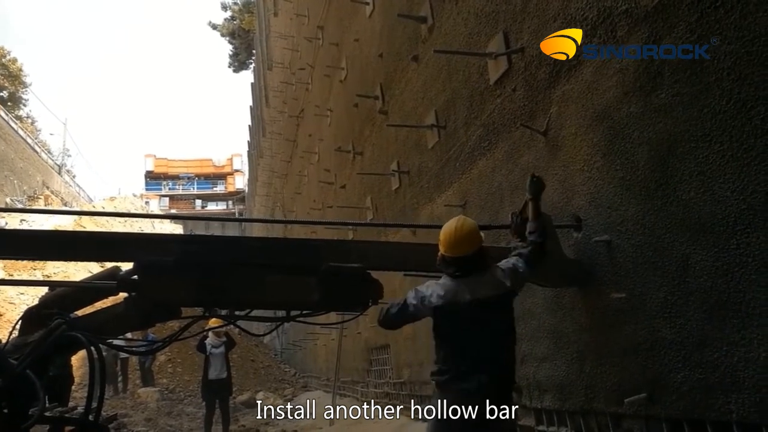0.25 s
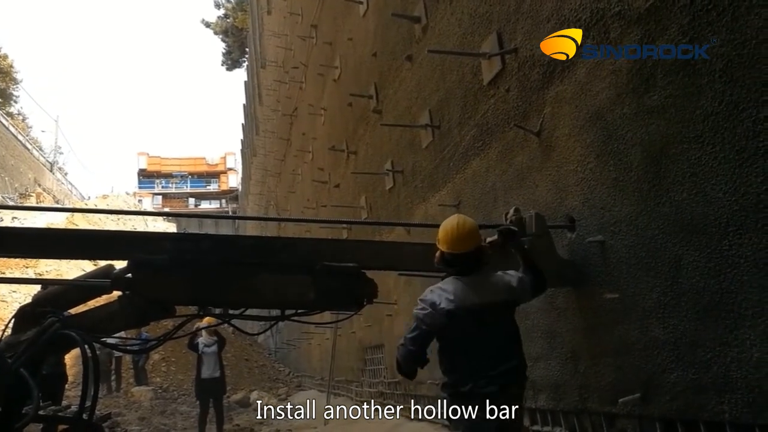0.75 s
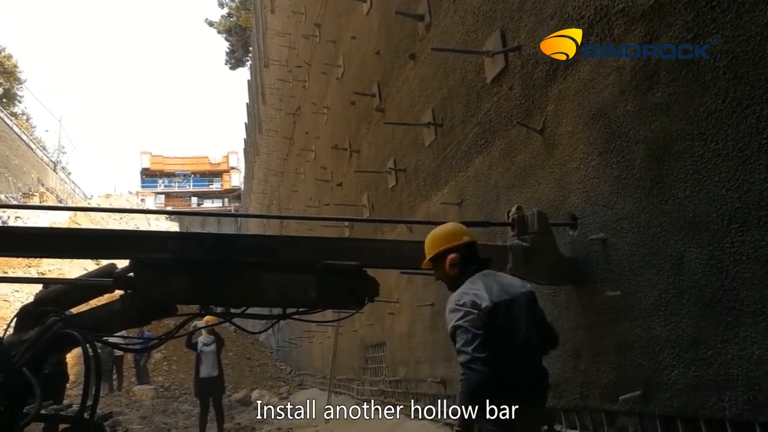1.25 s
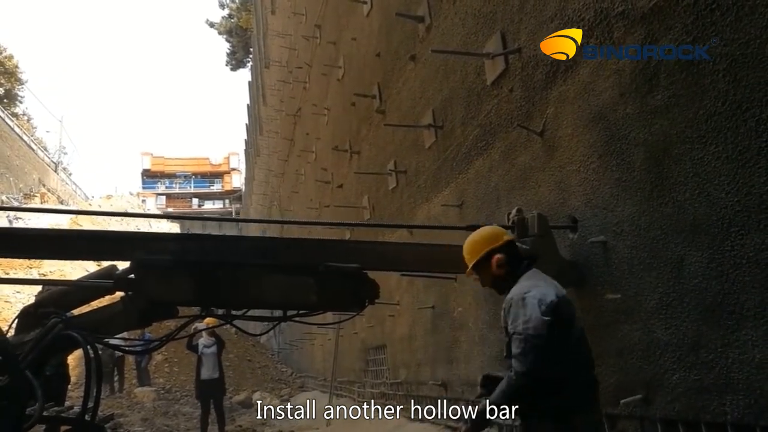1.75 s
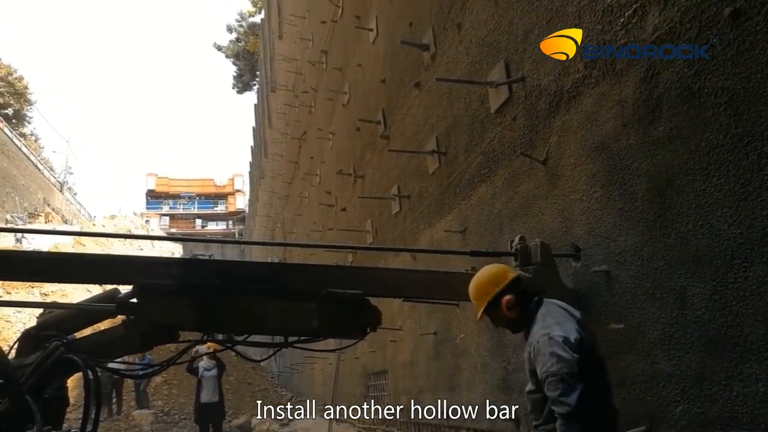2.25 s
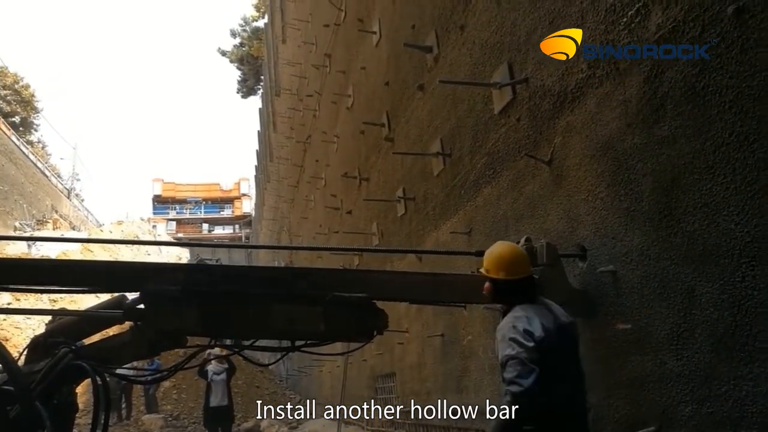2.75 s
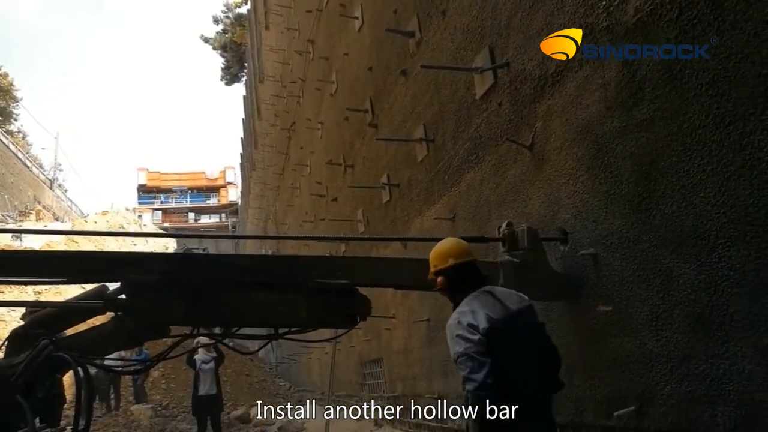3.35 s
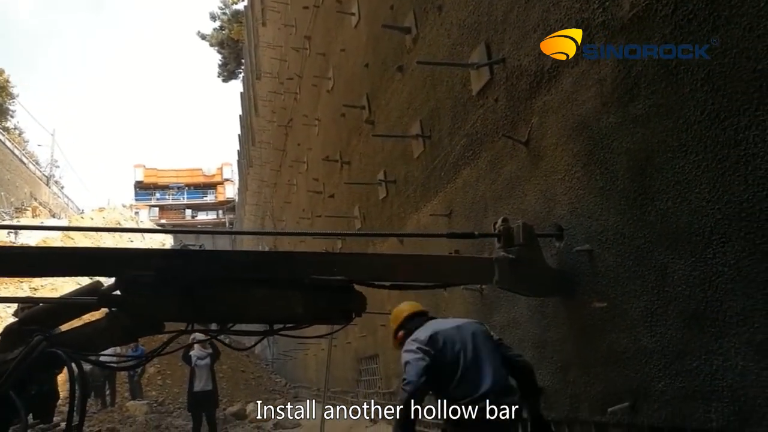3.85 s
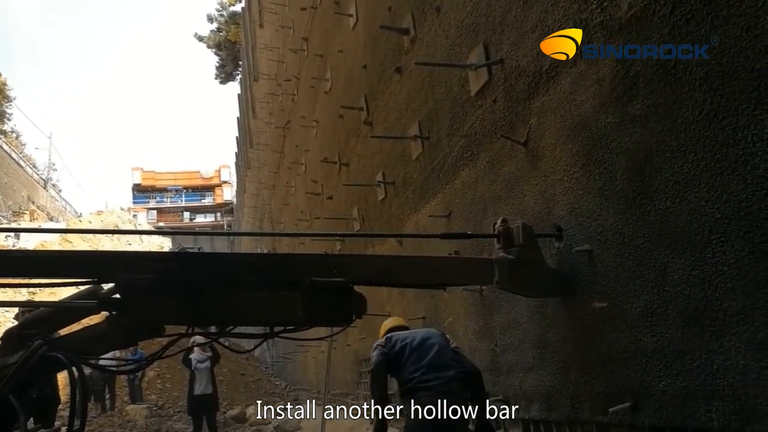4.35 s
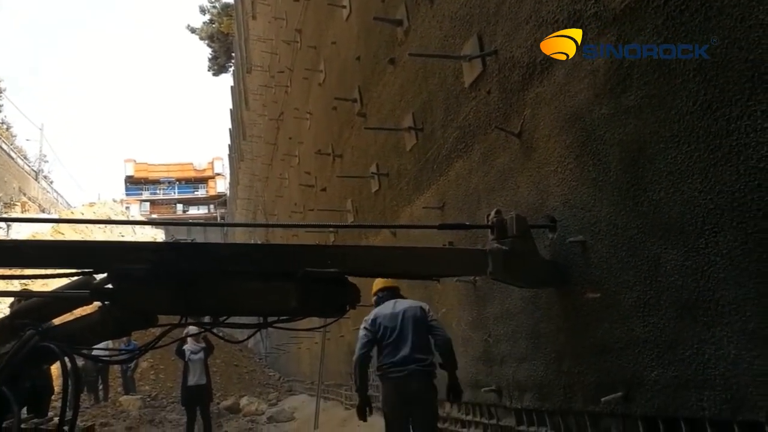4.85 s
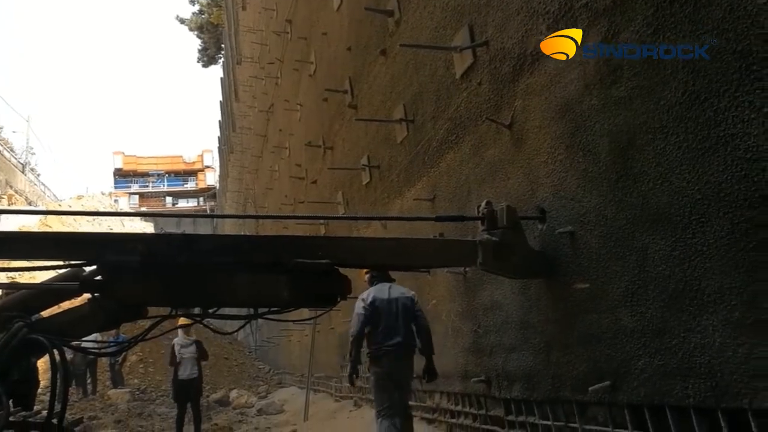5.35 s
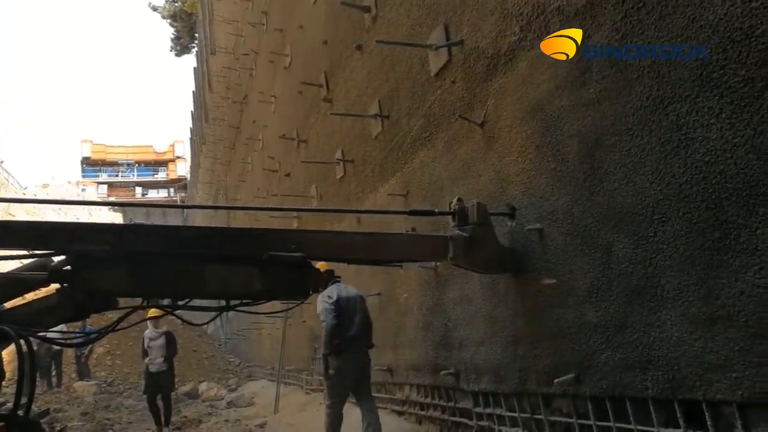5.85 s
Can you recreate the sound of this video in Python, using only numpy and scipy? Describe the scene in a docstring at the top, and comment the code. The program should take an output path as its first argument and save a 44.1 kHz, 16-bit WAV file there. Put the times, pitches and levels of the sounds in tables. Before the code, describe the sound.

Outdoors beside a shotcreted slope, a drill rig throbs quietly and low. Air seeps from a hollow steel bar, hissing faintly with a high flickering whistle. Two bright steel clinks come close together, the flow choking between them and then blowing free in a hiss that dies away. Wet spurts and raspy squeals follow, until a loud rush of air and water bursts out, buffeting the close microphone, spattering and knocking with mud.

```python
"""A drill rig throbs and rumbles while air and water begin to seep from a hollow steel bar: filtered noise and drops.
The seeping air soon whistles and squeals as gliding tones; then the steel clinks twice as a set of decaying partials.
Between the clinks the flow chokes, then it blows free; later come wet spurts, bursting slugs and rougher squeals.
At last the full rush breaks out with a blast of air, buffeting the microphone with deep noise,
spattering in random bursts and knocking as lumps of mud slap and thud."""
import sys
import numpy as np
from scipy import signal
from scipy.fft import rfft, irfft
from scipy.io import wavfile
from scipy.ndimage import uniform_filter1d, map_coordinates

SR = 44100
rng = np.random.default_rng(int(sys.argv[2]) if len(sys.argv) > 2 else 0)


def wrap_up_sound(samples):
    """Save the sound to the file named by the first command line argument, as 16-bit audio."""
    columns = np.atleast_2d(samples).T
    # keep every value between -1 and 1, then stretch to whole-number steps
    tamed = np.clip(columns, -1, 1)
    steps = np.round(tamed * 32767).astype(np.int16)
    wavfile.write(sys.argv[1], SR, steps)


N = 269892
T = np.arange(N) / SR
HZ = np.maximum(np.arange(N // 2 + 1) * SR / N, 1)


def undb(db):
    """Decibels to gain."""
    return 10 ** (np.asarray(db) / 20)


def unit(x):
    """Scale so that the mean of the channels has rms 1."""
    return x / np.std(np.atleast_2d(x).mean(axis=0))


def noise(channels=2):
    """White noise: independent channels of turbulence."""
    return rng.standard_normal((channels, N) if channels > 1 else N)


def curves(table):
    """The columns of a table, after its times, at every sample."""
    s, *columns = np.transpose(table)
    return [np.interp(T, s, c) for c in columns]


def window(start, end, fade):
    """Open between two times, with short power-keeping fades."""
    opening = np.clip((T - start) / fade + .5, 0, 1)
    closing = np.clip((end - T) / fade + .5, 0, 1)
    return np.sqrt(opening * closing)


def strike(start, t60, rise):
    """Envelope of a blow: a quick rise and an exponential fall."""
    age = np.maximum(T - start, 0)
    return np.minimum(age / rise, 1) * np.exp(-np.minimum(np.log(1000) * age / t60, 20))


def surge(start, rise, hold, fall):
    """Envelope of a push of air: it builds, holds and runs out."""
    spent = np.maximum(T - start - rise - hold, 0) / fall
    return np.clip((T - start) / rise, 0, 1) * np.exp(-np.minimum(spent ** 2, 20))


def shape(x, gain):
    """Filter by a gain at every frequency."""
    return irfft(rfft(x) * gain, N)


def lowpass(hz, order=4):
    """Gain of a smooth low-pass."""
    return 1 / np.sqrt(1 + (HZ / hz) ** (2 * order))


def highpass(hz, order=4):
    """Gain of a smooth high-pass."""
    return 1 / np.sqrt(1 + (hz / HZ) ** (2 * order))


def colour(points, resonances=()):
    """Gain of a broad spectrum with resonances on top."""
    hz, db = np.transpose(points)
    lifts = sum(lift / (1 + (2 * (HZ - f) / width) ** 2) for f, width, lift in resonances)
    return undb(np.interp(np.log(HZ), np.log(hz), db) + lifts)


def walk(rate):
    """Smooth chance with spread 1, moving up to about rate times a second."""
    return unit(shape(noise(1), lowpass(rate, order=2)))


def drops(rate, spread_db):
    """Droplet impacts in two channels: many small, a few large."""
    hit = rng.random((2, N)) < rate / SR
    size = undb(spread_db * np.minimum(rng.exponential(size=(2, N)), 4))
    return unit(hit * rng.choice([-1, 1], (2, N)) * size)


def spread(x, width, pan):
    """Stereo image: set the side level and the left-right balance at every frequency."""
    mid = (x[0] + x[1]) / 2
    side = shape((x[0] - x[1]) / 2, colour(width))
    balance = colour(pan) ** np.array([[.5], [-.5]])
    return shape(np.array([mid + side, mid - side]), balance)


def pit(x, t60, wet_db):
    """Direct sound in the centre; dense reflections from the walls of the cut widen it."""
    t = T[:SR // 2]
    tail = rng.standard_normal(len(t)) * undb(-60 * t / t60)
    echo = signal.fftconvolve(x, tail / np.sqrt(np.sum(tail ** 2)))[:N]
    return x + undb(wet_db) * echo * np.array([[1], [-1]])


def nearby(x, echo_db, reach_s, count=14):
    """Early echoes off the boom and the wall comb the treble and make it hollow."""
    echoes = np.zeros((2, N))
    for ear in echoes:
        at = (SR * reach_s * rng.uniform(.05, 1, count)).astype(int)
        ear[at] = rng.choice([-1, 1], count) / np.sqrt(count)
    share = undb(echo_db) * highpass(520, order=2)
    return shape(x, (1 + share * rfft(echoes)) / np.hypot(1, share))


def wander(x, depth_s, rate):
    """The air paths keep changing with the water in them, so their resonances drift in pitch."""
    at = (T + depth_s * walk(rate)) * SR
    return np.array([map_coordinates(ear, [at], order=5, mode="mirror") for ear in x])


def churn(x, patchy_db, low_db, span_s, bands_per_octave):
    """Water keeps reshaping the opening, so narrow bands swell and fade independently, the low ones most."""
    hz, s, z = signal.stft(x, SR, nperseg=1024, noverlap=768)
    octaves = np.log2(1 + hz / 600)
    chance = rng.standard_normal((128, 512))
    grid = np.meshgrid(octaves * bands_per_octave, s / span_s, indexing="ij")
    field = map_coordinates(chance, grid, mode="mirror")
    gain = undb((patchy_db + low_db * np.exp(-octaves ** 2))[:, None] * field)
    gain = gain / np.sqrt(np.mean(gain ** 2, axis=1, keepdims=True))
    return signal.istft(z * gain, SR, nperseg=1024, noverlap=768)[1][:, :N]


def follow(control_db, law):
    """Levels of air, spray and water that follow one control."""
    return np.array([db + slope * control_db for db, slope in law])


def flow(levels, gain, drop_rate, drop_db, flutter_db, gurgle_db):
    """Air hisses, spray crackles and water gurgles in one opening; passing water makes them flutter together."""
    air_db, spray_db, water_db = levels
    flutter = walk(18.0)
    gurgle = (flutter + walk(21)) / 2
    # level/dB, band gain, lower and upper f/Hz between which that level holds
    layers = [(air_db + .5 * flutter_db * flutter, highpass(3230), 4200, 15000),
              (spray_db + flutter_db * flutter, highpass(880) * lowpass(3900), 900, 3000),
              (water_db + gurgle_db * gurgle, highpass(168) * lowpass(845), 200, 800)]
    out = 0
    for db, band, lo, hi in layers:
        jet = unit(unit(noise()) + undb(drop_db) * drops(drop_rate, 3.44))
        strength = np.sqrt(np.mean((gain * band) ** 2 * (HZ > lo) * (HZ < hi)))
        out = out + shape(jet, gain * band) / strength * undb(db)
    return out


# seepage before the flow blows free, a control: t/s, level/dB
SEEP = [(0.0, -87), (0.21, -56), (0.27, -49), (0.42, -41), (0.6, -46), (0.72, -39), (0.79, -44),
        (0.92, -38.5), (1.24, -42), (1.34, -37), (1.43, -39.5), (1.52, -35.5), (2.0, -42.5), (2.06, -49),
        (2.14, -42.5), (2.47, -39.5), (2.48, -39.5)]
# how air, spray and water follow it: level/dB at the usual seepage, slope/dB per dB
SEEP_LAW = [(-37, 0.7), (-40, 1.0), (-44.5, 0.97)]
# the constant leak, before its build-up: air hiss level/dB, spray level/dB, water gurgle level/dB
LEAK_DB = (-43, -56, -55.5)
# build-up of the leak with the pressure: t/s, gain level/dB
LEAK_BUILD = [(0.15, -2.5), (0.35, 0.5)]
# spurts: t/s, rise/s, hold/s, air fall/s, air hiss level/dB, spray level/dB, water gurgle level/dB
SPURTS = [(2.722, 0.042, 0.23, 0.28, -22.5, -32, -42.5), (3.846, .01, 0.029, 0.13, -37.5, -40, -40),
          (3.864, 0.028, 0.017, 0.26, -34, -41, -58), (4.046, 0.01, 0.023, 0.12, -38.5, -49, -41),
          (4.187, 0.024, .02, 0.027, -44, -48.5, -67), (4.477, 0.0064, 0.038, 0.2, -38, -43, -52),
          (4.575, 0.057, .01, 0.036, -31.5, -35.5, -49.5), (4.672, 0.011, 0.035, 0.058, -43, -40.5, -37)]
SEEP_USUAL_DB, SEEP_END_S = -40, 2.76
AIR_SLOW_S = 0.19  # the air follows the seepage averaged over this time
WET_LINGER = 1.27  # spray and water fall this much longer than the air of a spurt
DRIP_DB, DRIP_FALLS = -8.5, 2.5  # drip after a spurt: level relative to it, decay in fall times


def coupling_levels():
    """Air, spray and water at the coupling: a constant leak, the early seepage, then spurts that drip away."""
    seep_db = follow(curves(SEEP)[0] - SEEP_USUAL_DB, SEEP_LAW)
    air_db = uniform_filter1d(seep_db[0], int(AIR_SLOW_S * SR), mode="nearest")
    seepage = undb([air_db, *seep_db[1:]]) * window(-1, SEEP_END_S, 0.03)
    leak = undb(LEAK_DB)[:, None] * undb(curves(LEAK_BUILD)[0])
    power = leak ** 2 + seepage ** 2
    for s, rise, hold, fall, *db in SPURTS:
        age = np.maximum(T - s - rise - hold, 0)
        drip = undb(DRIP_DB) * (T > s + rise) * np.exp(-age / (DRIP_FALLS * fall))
        air = surge(s, rise, hold, fall)
        wet = np.maximum(surge(s, rise, hold, fall * WET_LINGER), drip)
        power = power + (undb(db)[:, None] * np.array([air, wet, wet])) ** 2
    return 10 * np.log10(power)


# colour of each stage of the confined flow: f/Hz, relative level/dB per Hz
SEEP_COLOUR = [(88, -32), (150, -17), (285, -4.5), (359, -10), (420, -3.5), (453, -12), (656, -10.5),
               (1200, -5), (2700, -7), (3280, -5.5), (3550, -5.5), (4480, -5), (11800, -7.5), (15500, -9.5)]
BLOW_COLOUR = [(88, -42.5), (150, -20), (285, -8.5), (359, -18.5), (411, -10.5), (708, -16), (1040, -4.5),
               (1420, -3.8), (2060, 1), (2920, -1.5), (5650, -3.5), (7860, -4.5), (13300, -6.5),
               (15500, -9.5)]
SPUTTER_COLOUR = [(88, -38), (150, -20), (172, -11.5), (290, -4.5), (481, -5.5), (550, -12), (860, -10),
                  (1110, -13.5), (1510, -9), (3220, -9), (3910, -12), (9360, -13.5), (15500, -16)]
# resonances of the bar's bore and the coupling: f/Hz, width/Hz, lift level/dB
BORE = [(287, 48, 4.5), (420, 34, 2.5), (610, 250, -2), (813, 134, 5.5), (1195, 240, 3.5), (1960, 830, 2.5),
        (5680, 820, 3), (9640, 2400, 3)]
# narrow air resonances inside the hollow bar: f/Hz, width/Hz, lift level/dB
PIPE = [(2180, 37, -1.5), (3280, 70, 0), (3660, 130, 3), (5260, 84, 2), (5970, 110, 3), (6490, 50, 4.5),
        (6850, 60, 5), (7300, 60, 1), (9450, 59, 1.5), (12400, 39, -3), (13280, 62, 7)]
# stereo width of the confined flow: f/Hz, side minus mid level/dB
FLOW_WIDTH = [(60, -32), (110, -14), (200, -27), (380, 1.5), (700, 2.5), (1290, 0.5), (2380, 1), (4400, -1),
              (8120, 0.5), (15000, -0.5)]
# stereo balance of the confined flow: f/Hz, left minus right level/dB
FLOW_PAN = [(60, 0.0), (110, 0.0), (200, -0.78), (380, 0.11), (700, -1.2), (1290, -0.92), (2380, -1.1),
            (4400, 0.83), (8120, -0.76), (15000, -1)]
CHOKE_S, CHOKE_END_S, CHOKE_DB = 2.580, 2.610, -26


def confined_flow():
    """Flow through bar and coupling seeps, chokes, blows free and sputters, each stage with its own colour."""
    levels = coupling_levels()
    bar = BORE + PIPE
    seep = flow(levels, colour(SEEP_COLOUR, bar), drop_rate=2000, drop_db=-8.5, flutter_db=1.5, gurgle_db=0.4)
    blow = flow(levels, colour(BLOW_COLOUR, bar), drop_rate=1600, drop_db=-6.5, flutter_db=1.4, gurgle_db=2.5)
    sputter = flow(levels, colour(SPUTTER_COLOUR, bar),
                   drop_rate=2000, drop_db=-3.0, flutter_db=1.2, gurgle_db=2.0)
    inside = seep * window(-1, 2.6, .01) + blow * window(2.6, 3.6, .05) + sputter * window(3.6, 5.0, .05)
    inside = wander(nearby(inside, echo_db=-5, reach_s=.009), depth_s=.0002, rate=2.5)
    inside = churn(inside, patchy_db=1.6, low_db=2.6, span_s=.07, bands_per_octave=10)
    choke = undb(CHOKE_DB * window(CHOKE_S, CHOKE_END_S, 0.0017))  # water plugs the opening for a moment
    return undb(0.28) * spread(inside, FLOW_WIDTH, FLOW_PAN) * choke


# throb of the rig, before the lift in engine(): t/s, level/dB
SHUDDER = [(0.0, -58), (0.3, -54), (0.4, -46.5), (0.5, -50.5), (1.1, -52), (1.68, -44.5), (1.92, -55.5),
           (2.22, -48.5), (2.42, -51.5), (2.68, -48.5), (2.85, -53), (3.1, -50), (3.6, -55), (4.08, -50),
           (4.4, -55.5), (4.9, -55)]
# body of the rig: f/Hz, width/Hz, relative level/dB
FRAME = [(80.5, 8.9, -13), (103, 21, 0.5), (127.3, 14, 1.5), (158, 10, -13), (182, 19, -2), (287.5, 22, -6),
         (418, 17, -7.5)]
ENGINE_HZ = 25.9  # strokes per second
RATTLE_DB, RATTLE_RATE = 2.5, 4.7  # each resonance swells and fades by itself: spread, times per s


def engine():
    """Uneven strokes and turbulence throb through the frame of the rig, whose resonances come and go."""
    count = int(N / SR * ENGINE_HZ) + 2
    jitter, size = rng.standard_normal((count, 2)).T
    at = ((np.arange(count) + 0.049 * jitter) / ENGINE_HZ * SR).astype(int)
    strokes = np.bincount(np.abs(at), undb(1.9 * np.clip(size, -2, 1)), 2 * N)[:N]
    drive = shape(0.79 * unit(strokes) + noise(1), lowpass(560) * highpass(68))
    throb = 0
    for hz, width, db in FRAME:
        resonance = 1 / (1 + 1j * (HZ ** 2 - hz ** 2) / (HZ * width))
        throb = throb + undb(db + RATTLE_DB * walk(RATTLE_RATE)) * shape(drive, resonance)
    return unit(throb) * undb(curves(SHUDDER)[0] + 2.5)


# deep rumble under the rig: t/s, level/dB
RUMBLE = [(0.0, -64), (0.65, -47.5), (1.55, -49), (2.0, -59), (2.45, -53), (3.2, -63), (4.05, -59),
          (4.6, -64)]


def rumble():
    """Noise in a narrow deep band lies under the rig, rising and sinking."""
    deep = unit(shape(noise(1), highpass(39) * lowpass(51.5, order=7)))
    return deep * undb(curves(RUMBLE)[0])


def sing(pitch, rasp, octave_db, tear_hz, scrape):
    """An edge tone; spray tears a share of its power into a narrow rasp and a wider scrape."""
    count = len(pitch)
    turn = np.exp(2j * np.pi * np.cumsum(pitch) / SR)
    chance = rng.standard_normal(count) + 1j * rng.standard_normal(count)
    near, far = (signal.sosfilt(signal.butter(2, hz, fs=SR, output="sos"), chance)
                 for hz in (tear_hz, 4 * tear_hz))
    torn = near / np.std(near) + scrape * far / np.std(far)
    clean_tone = np.sqrt(1 - rasp) * (turn + undb(octave_db) * turn ** 2)
    torn_tone = np.sqrt(rasp) * torn / np.std(torn) * turn
    return np.sqrt(2) * (clean_tone + torn_tone).imag


# whistle of the seeping air: t/s, f/Hz, level/dB
WHISTLE = [(0.27, 3580, -58), (0.32, 3490, -44), (0.37, 3440, -45.5), (0.48, 3490, -38), (0.62, 3440, -42),
           (0.70, 3480, -34.5), (0.74, 3462, -39), (0.79, 3474, -32), (0.89, 3465, -37.5),
           (0.915, 3440, -55), (0.934, 3420, -33), (1.015, 3400, -35.5), (1.06, 3405, -60),
           (1.1, 3610, -52), (1.22, 3617, -43), (1.3, 3615, -52), (1.43, 3595, -44.5), (1.54, 3589, -36.5),
           (1.62, 3560, -48), (1.68, 3570, -36.5), (1.78, 3560, -48), (1.84, 3585, -38), (1.93, 3590, -40),
           (1.965, 3620, -50), (1.99, 3605, -37.5), (2.05, 3625, -63), (2.27, 3610, -54), (2.31, 3620, -36),
           (2.41, 3625, -38), (2.47, 3640, -52)]


def whistle(waver, flutter_db):
    """Seeping air sings over an edge of the coupling, swelling, bending and flickering."""
    pitch, db = curves(WHISTLE)
    tone = sing(pitch * (1 + waver * walk(35)), rasp=0.023, octave_db=-16, tear_hz=120, scrape=.4)
    return tone * undb(db + flutter_db * walk(35)) * window(WHISTLE[0][0], WHISTLE[-1][0], .02)


# squeals: t/s, length/s, f/Hz at mid-length, glide/Hz per s, level/dB, rasp at mid-length (0-1)
SQUEALS = [(0.288, 0.24, 8020, -900, -49, 0.1), (0.93, 0.2, 7980, 0, -44, 0.3),
           (4.032, 0.04, 3140, 0, -41, .5), (4.098, 0.035, 3690, -2500, -33, .15),
           (4.122, .1, 3200, -6000, -33.5, 0.8), (4.247, 0.053, 2230, -3000, -47, .5),
           (4.562, 0.12, 3720, -3700, -28.5, 0.25), (4.57, 0.077, 3190, 0, -40, .7),
           (4.615, 0.06, 5110, -1500, -37, 0.1), (4.661, 0.085, 3210, -9000, -48, 0.7)]
NOTE_PEAK, NOTE_FADE = 0.3, 0.93  # share of a squeal spent swelling; power of its swell and fade
SCOOP_HZ, SCOOP_S = 220, 0.0128  # starts this far under its pitch; time constant of catching up


def squeals(waver, flutter_db):
    """A short squeal starts nearly clean, scooping into its glide, and tears into a scrape as it fades."""
    tremble, flutter = walk(106), walk(70)
    out = np.zeros(N)
    for s, length, hz, glide, db, rasp in SQUEALS:
        on = (T > s) & (T < s + length)
        age = T[on] - s
        swell = np.sin(np.pi / 2 * np.interp(age / length, [0, NOTE_PEAK, 1], [0, 1, 0])) ** NOTE_FADE
        torn = np.clip(rasp * (2 * age / length) ** 1.6, 0, 1)
        pitch = hz + glide * (age - length / 2) - SCOOP_HZ * np.exp(-age / SCOOP_S)
        tone = sing(pitch * (1 + waver * torn * tremble[on]), torn, octave_db=-14, tear_hz=170, scrape=0.62)
        out[on] += tone * swell * undb(db + flutter_db * flutter[on])
    return out


def whistles():
    """The whistle and the squeals of the coupling, echoed by the walls."""
    tones = whistle(waver=0.0033, flutter_db=1.5) + squeals(waver=0.02, flutter_db=1.3)
    return pit(tones, t60=0.08, wet_db=-1.0)


# ring of the steel coupling: f/Hz, relative level/dB, t60/s
STEEL = [(1660, 5, 0.16), (2230, -9, .45), (3050, -15, .3), (3465, -4.5, 0.35), (3700, -1, 0.16),
         (4861, -18, .3), (5235, -4, 0.29), (6700, -12, .22), (7359, -5, 0.42), (8550, -9, .16),
         (9609, -5, 0.063), (10600, -5, .12), (11300, 5.5, .19), (13050, -8, .14)]
# clinks: t/s, ring level/dB, spit of air level/dB, brightest f/Hz, fall-off/dB one octave away, spit t60/s
CLINKS = [(2.51, -29.5, -22.5, 11000, 12, 0.22), (2.6101, -23.5, -31, 3900, 8.5, 0.26)]
# cavity of the coupling, which colours the spit: f/Hz, width/Hz, lift level/dB
CAVITY = [(1700, 260, 7), (2600, 340, -14), (3500, 700, 6), (4520, 300, -9), (6250, 1300, 3)]


def clinks():
    """Each clink rings the steel around its brightest pitch and spits air; the loose joint roughens the ring."""
    out = 0
    chatter = [undb(1.4 * walk(70)) * np.exp(.15j * walk(50)) for _ in STEEL]
    for s, ring_db, spit_db, bright_hz, falloff_db, spit_t60 in CLINKS:
        ring = 0
        for (hz, db, t60), rough in zip(STEEL, chatter):
            partial = (rough * np.exp(2j * np.pi * hz * (T - s))).imag
            partial_db = db - falloff_db * np.log2(hz / bright_hz) ** 2
            ring = ring + undb(partial_db) * strike(s, t60, 0.0011) * partial
        air = colour([(3000, 0.5), (8000, -4.0), (15000, -5)], CAVITY)
        spit = unit(shape(noise(), highpass(bright_hz / 3, order=1) * air))
        out = out + undb(ring_db) * pit(ring, t60=0.043, wet_db=-3)
        out = out + undb(spit_db) * spit * strike(s, spit_t60, 0.0014)
    return out


# slugs of water bursting out: t/s, level/dB, centre f/Hz, t60/s
SLUGS = [(3.854, -31, 934, 0.26), (3.964, -32.5, 300, 0.081), (4.067, -28, 800, 0.22),
         (4.482, -52, 3450, 0.1), (4.621, -33, 3450, 0.16), (4.677, -49, 330, 0.16),
         (5.025, -14, 2900, 0.098), (5.222, -26, 695, 0.067), (5.552, -26, 2400, .1),
         (5.59, -29, 500, 0.12), (5.648, -21, 1200, 0.075)]


def slugs():
    """A slug of water bursts into a brief shower of drops."""
    out = 0
    for s, db, hz, t60 in SLUGS:
        grain = unit(drops(9000, 2.8) + noise())
        band = highpass(max(hz / 1.66, 240), order=2) * lowpass(hz * 2.0, order=1)
        out = out + undb(db) * unit(shape(grain, band)) * strike(s, t60, 0.0011)
    return spread(out, FLOW_WIDTH, FLOW_PAN)


# load of water in the rush, a control: t/s, level/dB
RUSH_WATER = [(5.0, -44), (5.026, -35), (5.108, -45.5), (5.126, -40), (5.188, -36.5), (5.224, -31),
              (5.28, -33), (5.41, -34), (5.445, -39), (5.49, -30.5), (5.525, -36), (5.572, -27.5),
              (5.69, -33.5), (5.87, -40), (5.912, -32), (6.11, -40.5)]
# how air, spray and water follow it: level/dB at the usual load, slope/dB per dB
RUSH_LAW = [(-25, 0.16), (-33, 0.4), (-37.3, 1.0)]
# blast of air near the start of the rush: t/s, rise/s, hold/s, fall/s
BLAST = (4.997, 0.019, 0.009, 0.017)
RUSH_S, RUSH_RISE_S = 4.938, 0.058
RUSH_USUAL_DB, BLAST_AIR_DB = -35, -23


def rush_levels():
    """Air, spray and water open together, the water most steeply, and swell with the load; a blast adds air."""
    opening_db = 20 * np.log10(np.clip((T - RUSH_S) / RUSH_RISE_S, 1 / 20, 1))
    air, spray, water = follow(curves(RUSH_WATER)[0] - RUSH_USUAL_DB, RUSH_LAW)
    blast = undb(BLAST_AIR_DB) * surge(*BLAST)
    air = 10 * np.log10(undb(air + opening_db) ** 2 + blast ** 2)
    return air, spray + opening_db, water + 1.2 * opening_db


# colour of the full rush: f/Hz, relative level/dB per Hz
RUSH_COLOUR = [(47, -30), (80, 8), (252, -2), (329, -0.5), (468, -6), (535, -6), (597, -10), (761, -5),
               (1040, -5), (2100, -3), (2400, -4.5), (3990, -4.5), (9660, -6), (11500, -6.5), (15700, -3.5)]
# colour that the open jet adds: f/Hz, width/Hz, lift level/dB
MOUTH = [(5840, 820, 1.5), (9000, 1300, 2), (11700, 1400, -2.5), (15500, 900, 0)]
# stereo width of the open rush: f/Hz, side minus mid level/dB
RUSH_WIDTH = [(60, -14), (110, -4), (200, -1.5), (380, 3.5), (700, 5.5), (1290, -1), (2380, 1),
              (4400, -0.5), (8120, 0), (15000, 0)]
# stereo balance of the open rush: f/Hz, left minus right level/dB
RUSH_PAN = [(60, 1), (110, -2), (200, 1), (380, -2.5), (700, -2.5), (1290, -6), (2380, -3.0), (4400, -0.5),
            (8120, -2), (15000, -2.5)]


def full_rush():
    """Air and water rush out in full as an open jet, coarser with drops and wide in stereo."""
    rush = flow(rush_levels(), colour(RUSH_COLOUR, MOUTH),
                drop_rate=1800, drop_db=-2.5, flutter_db=0.8, gurgle_db=2.5)
    rush = wander(nearby(rush, echo_db=-11, reach_s=.016), depth_s=.0002, rate=3)
    rush = churn(rush, patchy_db=2.0, low_db=1.3, span_s=.035, bands_per_octave=10)
    return undb(0.13) * spread(rush, RUSH_WIDTH, RUSH_PAN) * window(RUSH_S, 7, 0.024)


# push of the blast on the microphone: t/s, rise/s, hold/s, fall/s
BLAST_PUSH = (5.005, .025, .025, .033)
GUST_DB, BOOM_DB = -5.5, -6.0  # relative to the water in the rush
THUMP_HZ, THUMP_DB, BLAST_WIND_DB = 42, -27, -37  # swing of the microphone; wind of the blast


def buffet():
    """Gusts and boom shake the microphone with the water of the rush; the blast adds a thump."""
    gusts = unit(shape(noise(1), highpass(15, order=2) * lowpass(44, order=3)))
    boom = unit(shape(noise(1), highpass(68, order=6) * lowpass(126)))
    water_db = rush_levels()[2]  # the more water in the jet, the more it booms
    swing = undb(THUMP_DB) * np.sin(2 * np.pi * THUMP_HZ * (T - BLAST_PUSH[0]))
    thump = surge(*BLAST_PUSH) * (swing + undb(BLAST_WIND_DB) * (gusts + boom))
    shaking = gusts * undb(water_db + GUST_DB) + boom * undb(water_db + BOOM_DB)
    return thump + shaking * window(RUSH_S, 7, .03)


# gobs of water torn up by the rush: centre f/Hz, rate/gobs per s, t60/s, level/dB at the usual load
GOBS = [(710, 40, .05, -41), (1400, 55, .035, -40.5), (2600, 70, .025, -38.5), (4750, 82, .018, -39)]
GOB_LAW = 0.63  # dB of spatter per dB of load


def spatter(size_db):
    """Gobs of water burst at random in the rush; the small ones are brighter, shorter and more frequent."""
    out, t = 0, T[:SR // 10]
    for hz, rate, t60, db in GOBS:
        gobs = (rng.random(N) < rate / SR) * undb(size_db * np.minimum(rng.exponential(size=N), 3))
        bursts = signal.fftconvolve(gobs, undb(-60 * t / t60))[:N]
        band = highpass(hz / 1.4, order=2) * lowpass(hz * 1.6, order=3)
        out = out + undb(db) * unit(shape(bursts * noise(), band))
    load_db = curves(RUSH_WATER)[0] - RUSH_USUAL_DB
    return spread(out, RUSH_WIDTH, RUSH_PAN) * undb(GOB_LAW * load_db) * window(RUSH_WATER[0][0], 7, 0.041)


# lumps of mud knocking in the rush: t/s, level/dB, brightness f/Hz
KNOCKS = [(5.130, -21, 900), (5.217, -21, 500), (5.2235, -13, 1000), (5.233, -18, 600), (5.252, -25, 200),
          (5.262, -20.5, 170), (5.385, -23, 900), (5.407, -26, 1500), (5.414, -23, 140), (5.499, -26, 800),
          (5.554, -21, 900), (5.57, -24, 600), (5.587, -21, 1200), (5.600, -20, 900), (5.652, -26, 1000),
          (5.678, -24, 140), (5.692, -22, 400), (5.766, -30, 1200), (5.904, -18, 1500), (5.940, -19, 1300)]


def knocks(thud_db, thud_t60):
    """Each lump lands with one sharp slap and a short dull thud."""
    slaps, thuds = np.zeros(N), np.zeros(N)
    for s, db, hz in KNOCKS:
        phase = np.clip(2 * np.pi * hz * (T - s), -8, 8)
        slaps += undb(db) * -phase * np.exp((1 - phase ** 2) / 2)  # one swing each way
        thuds += undb(db) * strike(s, thud_t60, 0.00091)
    body = unit(shape(noise(1), highpass(220, order=3) * lowpass(520, order=2)))
    return pit(slaps + undb(thud_db) * body * thuds, t60=.04, wet_db=-5)


def scene():
    """All sources at the microphone."""
    rig = engine() + rumble()
    coupling = confined_flow() + whistles() + clinks() + slugs()
    outbreak = full_rush() + buffet() + spatter(size_db=2.5) + knocks(thud_db=-15.5, thud_t60=0.075)
    return rig + coupling + outbreak


TOP_HZ = 15760


def record(dry):
    """The recorder rounds the highest peaks and cuts the top."""
    rounded = .85 * np.tanh(dry / .85)
    return signal.sosfilt(signal.ellip(12, .1, 80, TOP_HZ, fs=SR, output="sos"), rounded)


dry = scene()
out = record(dry)
wrap_up_sound(out)
```